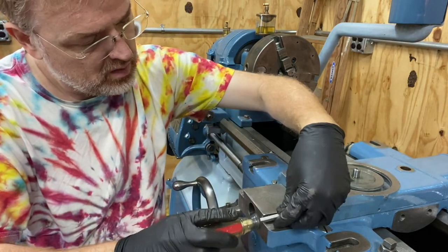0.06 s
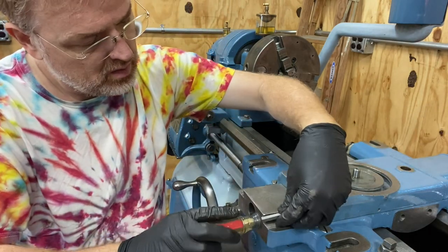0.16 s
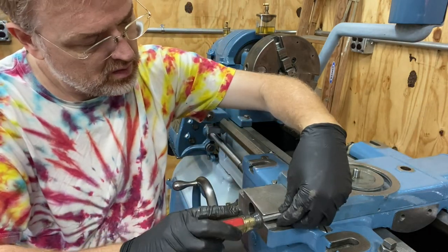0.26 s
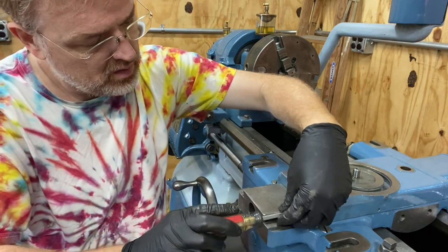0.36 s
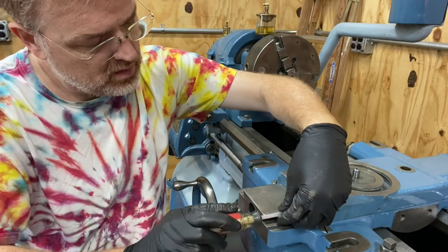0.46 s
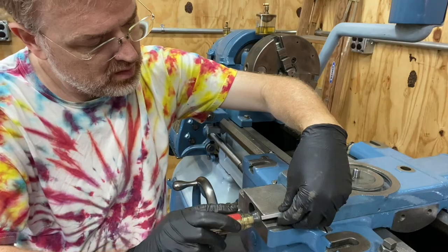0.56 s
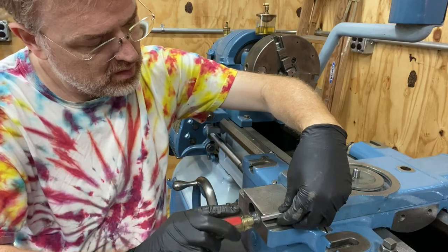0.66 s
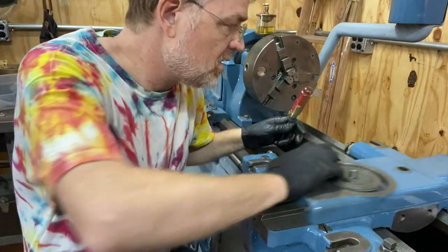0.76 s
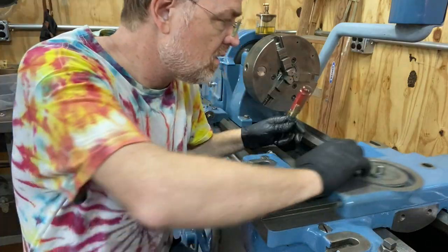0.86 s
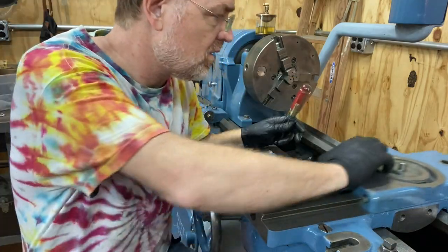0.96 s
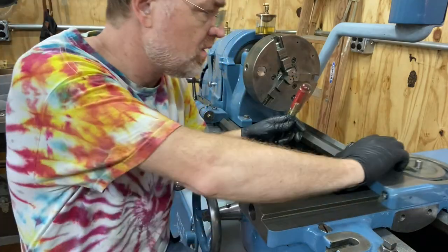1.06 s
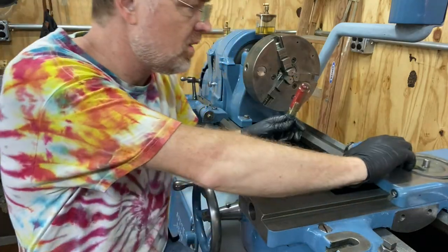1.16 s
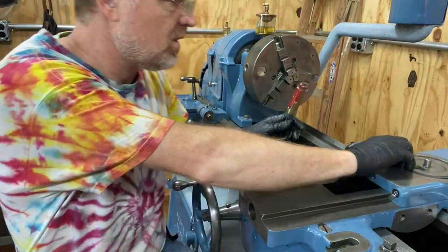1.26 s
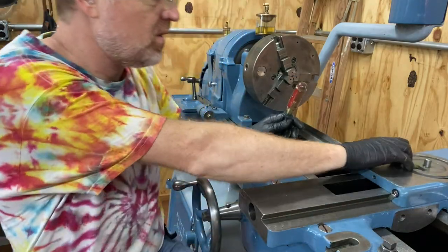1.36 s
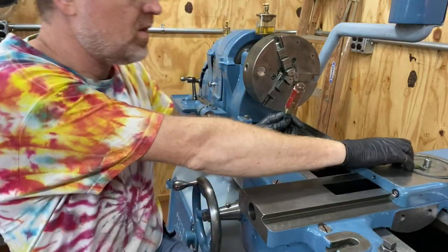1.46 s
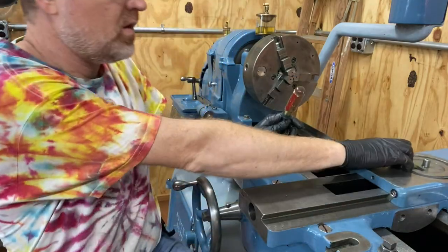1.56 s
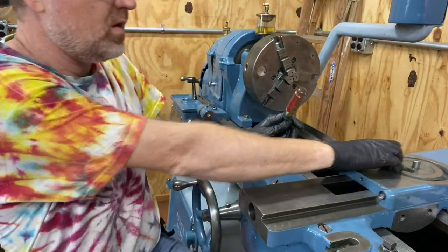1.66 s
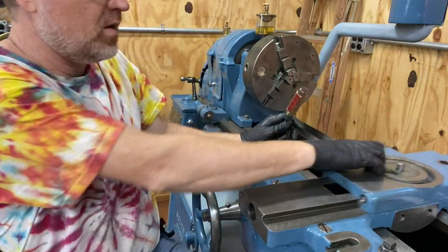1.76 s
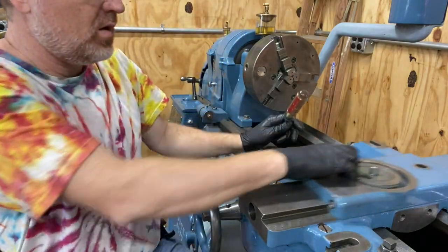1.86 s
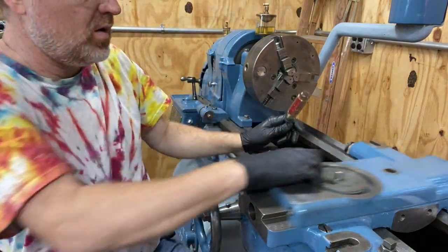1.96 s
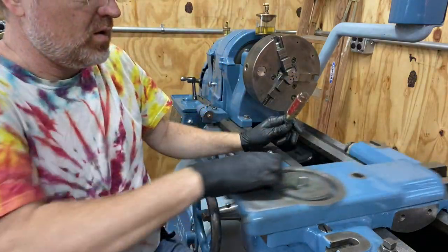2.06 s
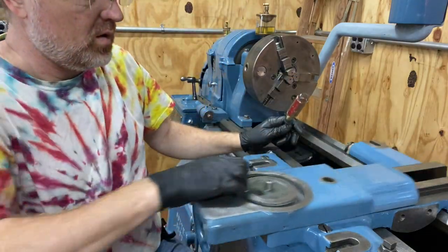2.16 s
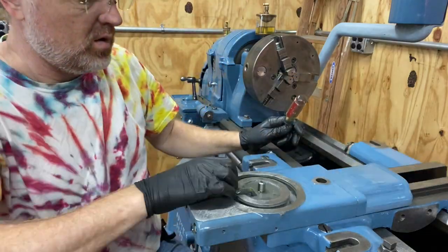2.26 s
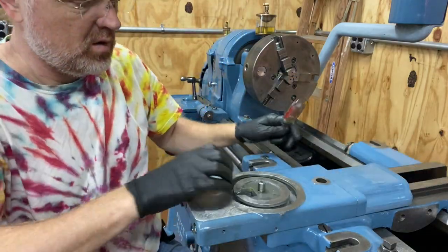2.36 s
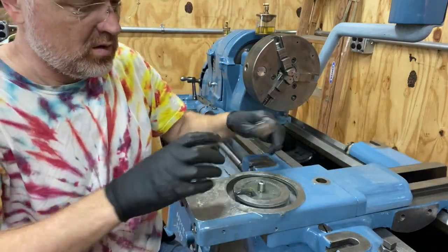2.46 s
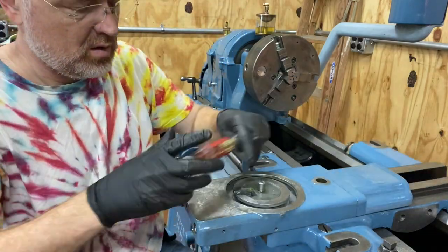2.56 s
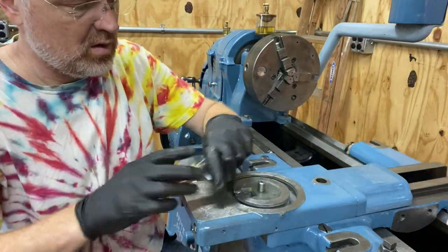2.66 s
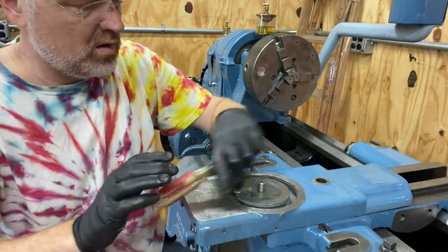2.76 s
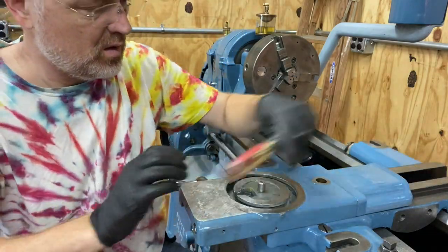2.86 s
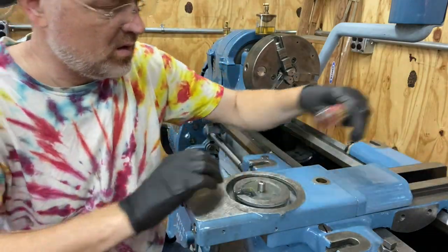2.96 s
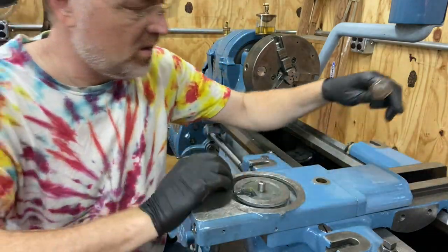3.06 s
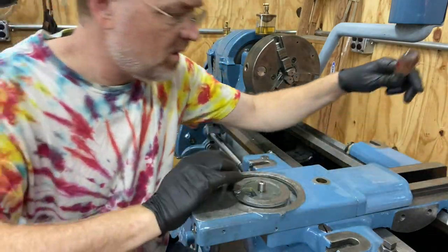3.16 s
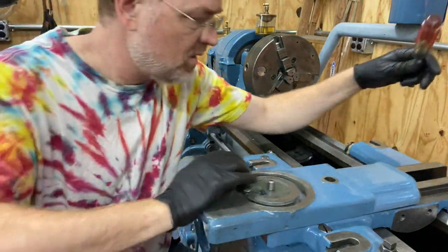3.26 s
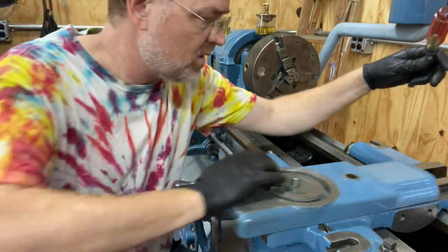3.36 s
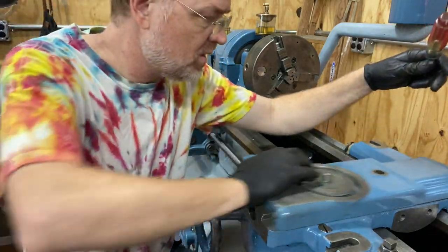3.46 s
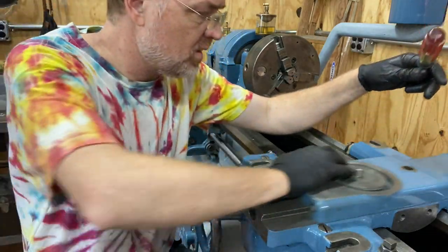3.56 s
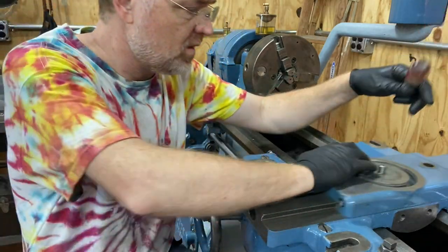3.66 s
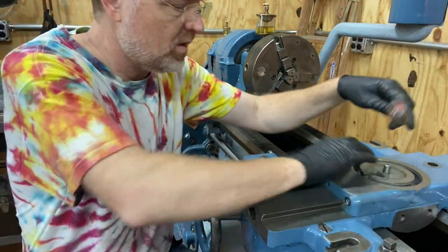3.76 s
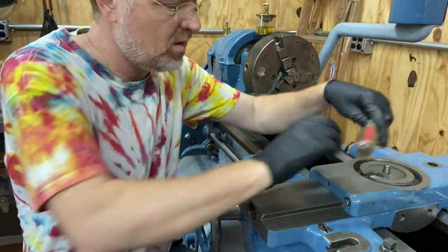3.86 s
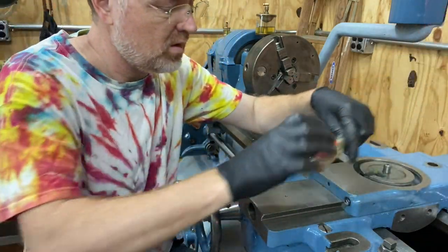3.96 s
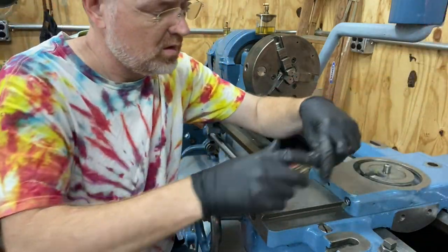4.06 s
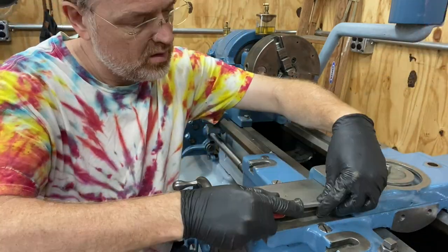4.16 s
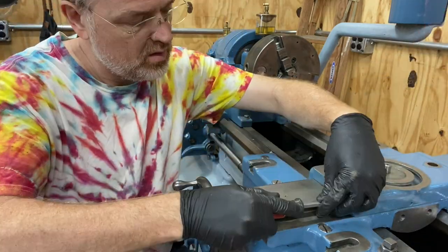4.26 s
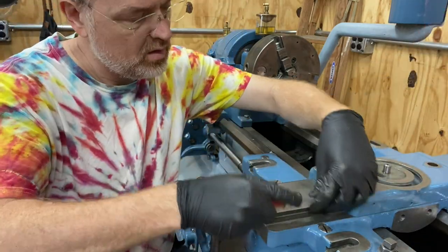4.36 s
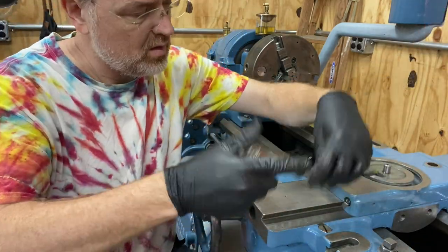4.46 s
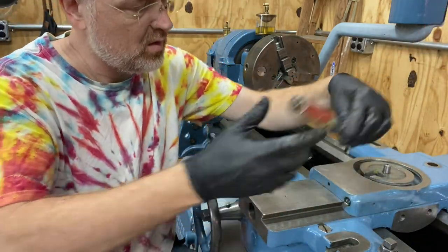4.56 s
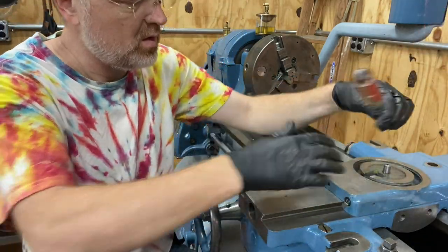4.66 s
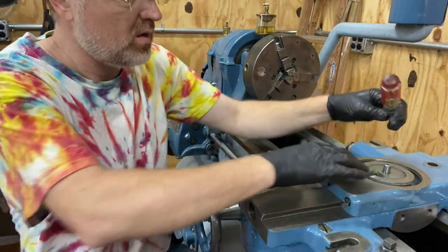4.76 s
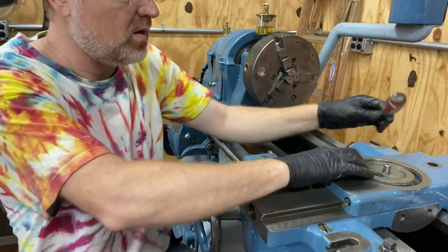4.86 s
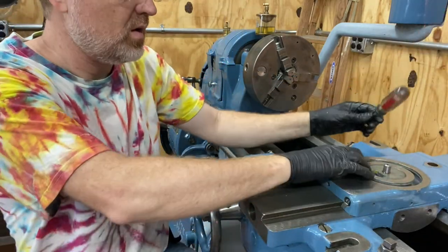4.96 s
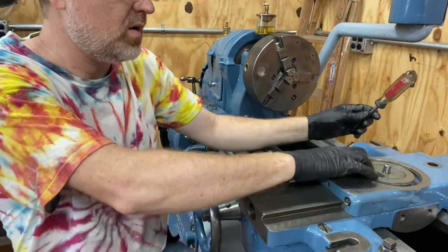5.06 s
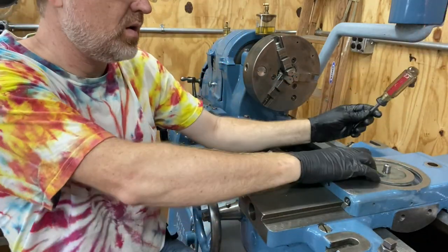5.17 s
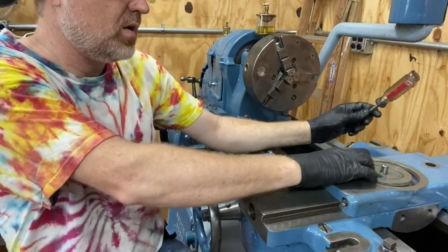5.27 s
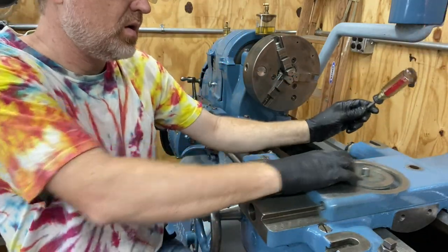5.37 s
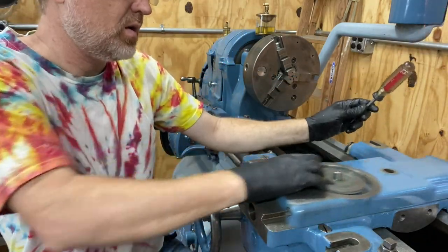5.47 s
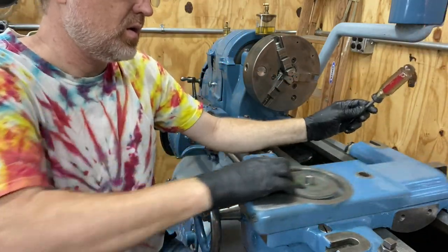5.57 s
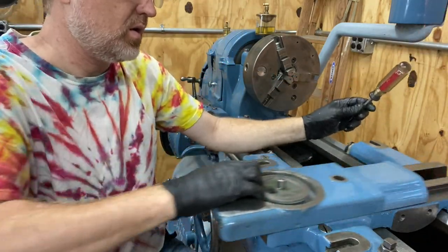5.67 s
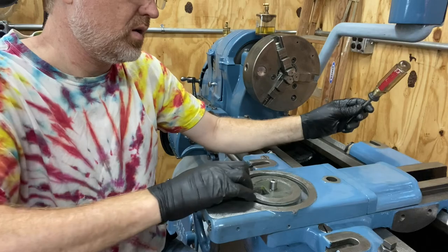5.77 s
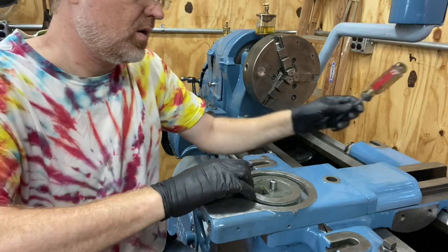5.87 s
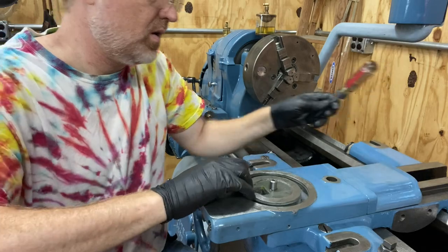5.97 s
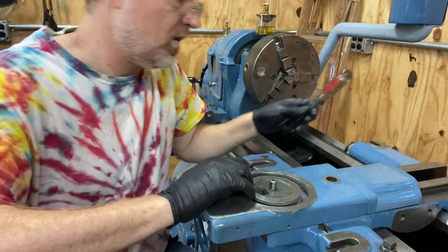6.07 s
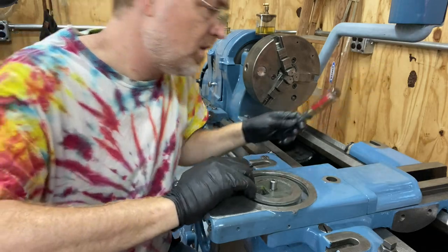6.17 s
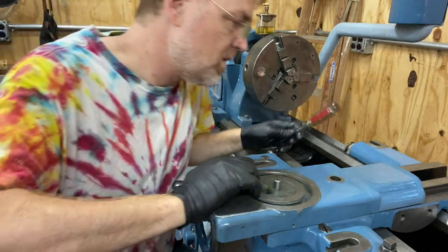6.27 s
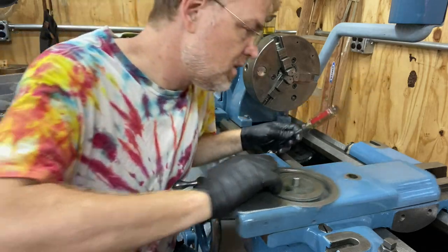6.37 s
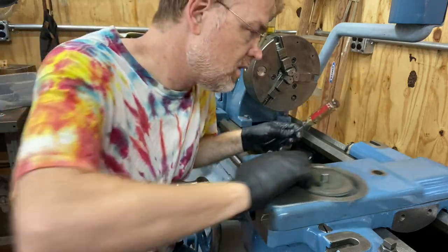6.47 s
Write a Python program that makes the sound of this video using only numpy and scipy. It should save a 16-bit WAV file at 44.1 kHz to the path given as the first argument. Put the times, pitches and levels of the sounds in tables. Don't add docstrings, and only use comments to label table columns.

```python
import sys
import numpy as np
from scipy import signal
from scipy.fft import rfft, irfft, next_fast_len
from scipy.io import wavfile
from scipy.ndimage import uniform_filter1d

SR = 44100
rng = np.random.default_rng(int(sys.argv[2]) if len(sys.argv) > 2 else 0)


def unload_audio(sound):
    columns = np.transpose(np.atleast_2d(sound))
    steps = np.round(np.clip(columns, -1, 1) * 32767)
    wavfile.write(sys.argv[1], SR, steps.astype(np.int16))


def invert_db(x):
    u = np.asarray(x, float) / 20
    return 10 ** u


N = 287973
LEFT_LAG_SAMPLES = 12
APART_HZ = 330

# freq_hz, level_db_per_hz
SCRAPE_COLOUR = [(260, -26), (450, -13.5), (737, -4.5), (840, 0.5), (920, -2), (1300, -2.5), (3550, -4.5),
                 (5000, -13), (6500, -42.5), (11000, -120)]
# (freq_hz, level_db, t60_s)
TAP_BODY = ([(180, -51), (300, -35), (714, -6.5), (869, -13), (1300, 1.5), (2660, -9), (8500, -15)],
             [(774, 1.5, 0.1), (994, -2.5, 0.13), (1283, -6, 0.1), (1650, -8, .08), (2160, -11, 0.066)])
CUTS_S = [0, .604, 2.562, 4.115, 6.6]


def evened(x):
    return x / np.sqrt(np.mean(x ** 2) + 1e-20)


def read(points, hz):
    f, value = np.transpose(points)
    return np.interp(np.log(hz + 1), np.log(f + 1), value)


def add(mix, start_s, sound):
    part = mix[..., round(start_s * SR):][..., :sound.shape[-1]]
    part += sound[..., :part.shape[-1]]


def opened(points, fall_db):
    return points + [(14900, points[-1][1] + fall_db), (15600, -57)]


def coloured(x, points, tilt_db=0):
    hz = np.fft.rfftfreq(4096, 1 / SR)
    gain_db = read(points, hz) + tilt_db * np.log2(hz / 1000 + 0.025)
    half = np.log(invert_db(np.maximum(gain_db, -90)))
    log_gain = np.r_[half, half[-2:0:-1]]
    phase = -signal.hilbert(log_gain).imag
    taps = np.fft.ifft(np.exp(log_gain + 1j * phase)).real[:2048]
    return signal.oaconvolve(x, taps / np.linalg.norm(taps))[:len(x)]


def resonate(x, hz, width_hz):
    turn = np.exp(2j * np.pi * np.cumsum(hz) / SR)
    r = np.exp(-np.pi * width_hz / SR)
    return 2 * (turn * signal.lfilter([1 - r], [1, -r], x / turn)).real


def air():
    # freq_hz, level_db_per_hz
    air_colour = [(120, -28), (200, 0), (748, -10.5), (3000, -15), (7970, -29), (13200, -19),
                  (15000, -36.5)]
    hiss = np.array([evened(coloured(rng.standard_normal(N), air_colour)) for _ in range(2)])
    whine = resonate(rng.standard_normal(N), np.full(N, 4800), 40)
    return invert_db(-71) * hiss + invert_db(-85.5) * evened(whine)


def bed(scrape_gain):
    # freq_hz, level_db_per_hz
    rumble_colour = [(12, -35), (20, 11), (59, 9.5), (145, -3.5), (173, -11), (248, -8), (357, -23.5),
                     (400, -10), (520, -38.5), (880, -120)]
    # start_s, level_db, t60_s
    shudders = [(0.84, -51, 1), (1.2, -42, 0.38), (1.86, -44, 0.25), (2.22, -41, 0.63), (2.78, -31, 0.27),
                (3.04, -34.5, 0.3), (3.358, -31.5, 0.14), (3.72, -41.5, 0.53), (3.96, -43.5, 0.38),
                (4.88, -34.5, 0.72), (5.33, -51, 0.36), (5.6, -41.5, 1), (6.149, -45, 0.47)]
    quiet_db, drag_share_db, rise_s = -62, -15.5, 0.026
    shared, left, right = (coloured(rng.standard_normal(N), rumble_colour) for _ in range(3))
    power = invert_db(quiet_db) ** 2 + (invert_db(drag_share_db) * scrape_gain) ** 2
    t = np.arange(SR // 2) / SR
    for s, db, t60 in shudders:
        add(power, s, (np.minimum(t / rise_s, 1) * invert_db(db - 60 * t / t60)) ** 2)
    return np.sqrt(power) * evened(shared + .3 * np.array([left, right]))


def control():
    # time_s, drag_db, speed_0_to_1
    pushes = [
        [(0.706, -45, 0.8), (0.8, -49, 0.88), (0.97, -50.5, .95), (1.09, -50, 0.64), (1.166, -51.5, 0.43),
         (1.28, -64, 0.2)],
        [(1.51, -65, 0.04), (1.54, -54, 0.37), (1.6, -51, 0.77), (1.8, -49.5, 0.9), (1.92, -46.5, 0.82),
         (2.04, -41, 0.97), (2.168, -46, 0.7), (2.23, -72, 0)],
        [(3.14, -54, 0.27), (3.246, -44.5, 0.82), (3.426, -44, 0.93), (3.55, -48.5, 0.84), (3.67, -51, 0.81),
         (3.72, -60, 0.15)],
    ]
    # time_s, drag_db, speed_0_to_1
    pulls = [
        [(5.19, -65, 0.13), (5.29, -50.5, 0.79), (5.418, -47.5, 0.83), (5.476, -45.5, 0.9), (5.59, -44, 0.89),
         (5.68, -47.5, 0.72), (5.73, -76, 0.13)],
        [(6.185, -68, .05), (6.254, -49.5, 0.77), (6.36, -46, 0.83), (6.43, -42.5, 0.88), (6.53, -52.5, 0.87)],
    ]
    # start_s, length_s, scrape_db, hiss_db, fade_db (over the length)
    brushes = [(0, 0.14, -97, -66.5, -9), (0.604, 0.07, -47, -52.5, -27), (2.555, 0.091, -65, -56, -10.5),
               (2.665, 0.11, -63, -87, -4.5), (2.973, 0.061, -60, -61, -4), (3.04, 0.084, -49.5, -60, -1),
               (3.726, 0.11, -79, -66.5, -8), (3.853, 0.072, -88, -73, -7), (4.268, 0.04, -80, -74, 0),
               (3.976, 0.13, -63.5, -65.5, 5), (4.31, 0.13, -64.5, -59.5, -2), (4.455, 0.22, -74, -73, -10),
               (4.712, 0.15, -62, -70, 2), (4.87, 0.23, -42, -60.5, -19.5), (1.306, 0.23, -75, -68.5, -9.5),
               (5.036, .14, -91.5, -75.5, 6), (5.768, 0.17, -85, -67, -11)]
    grip_s, let_go_s, brush_rise_s = 0.0034, 0.071, 0.0078
    fast_hiss_db, hiss_db_per_speed = -50, 24.5
    t = np.arange(N) / SR
    scrape, hiss = np.full(N, invert_db(-83.5) ** 2), np.full(N, invert_db(-81) ** 2)
    speed = np.zeros(N)
    for stroke in pushes + pulls:
        s, drag_db, pace = np.transpose(stroke)
        on = np.clip((t - s[0]) / grip_s + 1, 0, 1) * np.clip((s[-1] - t) / let_go_s + 1, 0, 1)
        pace = np.interp(t, s, pace)
        scrape += (on * invert_db(np.interp(t, s, drag_db))) ** 2
        hiss += (on * invert_db(fast_hiss_db + hiss_db_per_speed * (pace - 1))) ** 2
        speed += on * pace
    for start, length, scrape_db, hiss_db, fade_db in brushes:
        count = round(length * SR)
        fade = invert_db(fade_db * np.linspace(0, 1, count))
        fade = fade * np.minimum(np.arange(count) / SR / brush_rise_s, 1)
        add(scrape, start, (invert_db(scrape_db) * fade) ** 2)
        add(hiss, start, (invert_db(hiss_db) * fade) ** 2)
    return np.sqrt(scrape), np.sqrt(hiss), speed


def grit(per_s, spread_db):
    at = rng.integers(0, N, int(per_s * N / SR))
    size = invert_db(spread_db * np.minimum(rng.exponential(1, len(at)), 4))
    out = np.zeros(N)
    out[at] = size * rng.choice([-1., 1.], len(at))
    return evened(out)


def wander(hz, db):
    slow = signal.lfilter(*signal.butter(N=2, Wn=hz, fs=SR), rng.standard_normal(N))
    return invert_db(db * evened(slow))


def squeaks(per_s, lo_hz, hi_hz, count=14):
    out = np.zeros(N)
    for hz in np.geomspace(lo_hz, hi_hz, count):
        t = np.arange(0, rng.uniform(0.0079, 0.042), 1 / SR)
        bend_per_s = rng.uniform(-4.5, 1.0)
        note = np.hanning(len(t)) * np.sin(2 * np.pi * hz * t * (1 + bend_per_s * t))
        out += signal.oaconvolve(grit(per_s / count, 3.3), note / np.linalg.norm(note))[:N]
    return evened(coloured(out, SCRAPE_COLOUR))


def groans(catches):
    # middle_s, length_s, level_db (over the scrape), pitch_hz
    tight_spots = [(0.956, 0.29, -7.5, 253), (1.08, 0.24, -11, 540), (1.006, .12, -3, 1200),
                   (1.99, 0.062, -1.5, 2430), (2.05, 0.071, -3, 1540), (2.16, 0.072, -6, 2740),
                   (5.385, 0.046, -1, 970), (5.41, 0.1, 1, 1500), (5.49, .06, -1, 2100),
                   (6.4, .06, -2.5, 4400), (6.3, 0.049, -6, 2400), (5.31, .1, -4, 1450),
                   (1.565, 0.039, -4, 470), (1.845, 0.23, -3.5, 260), (2.13, 0.24, -1, 498),
                   (2.126, 0.13, -2, 258), (3.36, 0.14, -3, 526), (3.29, .05, -2, 1700),
                   (3.435, .05, -3, 2430), (3.51, .06, -3, 1400), (4.33, .06, 4, 2500), (4.6, .2, 3, 3100),
                   (5.365, 0.19, -12.5, 273), (5, 0.1, 0, 550), (6.34, 0.22, -1.5, 500),
                   (1.786, 0.18, -10.5, 590), (3.5, 0.19, -4, 765), (6.24, 0.11, -6, 810),
                   (2.14, 0.13, 1, 800), (5.9, 0.17, 5.5, 2100), (3.37, 0.28, -7.5, 245),
                   (5.45, 0.17, -11, 2000), (4.325, 0.046, 9.5, 1700), (4.352, 0.065, 14, 4100),
                   (2.062, 0.096, 2, 1170), (5.592, 0.12, -2, 1500)]
    width_share = 0.37
    out = invert_db(-12) * evened(signal.lfilter(*signal.iirpeak(550, 1.3, SR), catches))
    for s, length, db, hz in tight_spots:
        swell = np.hanning(round(length * SR))
        part = catches[round((s - length / 2) * SR):][:len(swell)]
        ring = signal.iirpeak(hz, 1 / width_share, SR)
        groan = evened(signal.lfilter(*ring, signal.lfilter(*ring, part)))
        add(out, s - length / 2, invert_db(db - 0.5) * swell * groan)
    return out


def patchy(x):
    z = signal.stft(x, nperseg=512)[2]
    patches = uniform_filter1d(rng.standard_normal(z.shape[1:]), size=5, axis=0)
    patches = evened(uniform_filter1d(patches, size=9, axis=1))
    return signal.istft(z * invert_db(1.7 * patches), nperseg=512)[1][:, :N]


def slide(scrape_gain, hiss_gain, speed):
    # freq_hz, level_db_per_hz
    hiss_colour = [(1760, -8.5), (3000, -1.5), (3650, 3.5), (5260, -0.5), (8500, -3)]
    # freq_hz, width_hz, level_db
    slide_rings = [(593, 14, -9), (1260, 115, -1), (2330, 43, 5), (3100, 14, 7)]
    slow_hz, fast_hz = 900, 1360
    drag, specks = wander(30, 1.3), squeaks(500, 500, 3600)
    centre_hz = (slow_hz + (fast_hz - slow_hz) * speed) * wander(5, .6)
    sides = []
    shared = grit(5000, 0.93)
    for _ in range(2):
        catches = (shared + 1.97 * grit(5000, 2.3)) * drag
        rings = np.zeros(N)
        for hz, width, db in slide_rings:
            rings += invert_db(db) * evened(signal.lfilter(*signal.iirpeak(hz, hz / width, SR), catches))
        scrape = evened(coloured(catches, SCRAPE_COLOUR)) + invert_db(-29) * evened(rings)
        scrape += invert_db(-11.0) * evened(resonate(catches, centre_hz, 320)) + invert_db(-5) * specks
        scrape += groans(catches)
        fine = (shared + 8.5 * grit(9000, 3.55)) * drag ** 0.35
        hiss = evened(coloured(fine, opened(hiss_colour, -5.0)))
        sides.append(scrape_gain * evened(scrape) + invert_db(1.87) * hiss_gain * hiss)
    return invert_db(3.0) * patchy(np.array(sides))


def knocks(events, body, ring_db, crack_db, rise_s, treble_fade, top_db):
    colour, rings = body
    out, t = np.zeros((2, N)), np.arange(SR // 3) / SR
    lead_s = np.array([[LEFT_LAG_SAMPLES / SR], [0]])
    end_fade = np.minimum(20 * (t[-1] - t), 1)
    for s, db, t60, *more in events:
        pan_db, tilt_db = more or (0, 0)
        hz, frame_s, z = signal.stft(rng.standard_normal(len(t)), SR, nperseg=256)
        hz = np.maximum(hz, 120)[:, None]
        decay = invert_db(-60 * frame_s / (t60 * (hz / 1000) ** -treble_fade))
        z = z * decay * (1 - np.exp(-(frame_s + 0.0016) * hz / 0.85))
        buzz = signal.istft(z, SR, nperseg=256)[1][:len(t)] * np.minimum(t / rise_s, 1)
        buzz[0] = invert_db(crack_db)
        blow = coloured(buzz, opened(colour, top_db), tilt_db)
        for f, d, ring in rings:
            shape = invert_db(ring_db + d - 60 * t / min(ring, 1.3 * t60))
            shape = shape * np.minimum(t / (rise_s + 1.3 / f), 1)
            twin_hz = (1 + 0.011 * rng.uniform(-0.97, 1)) * f
            twin_turns = rng.random((2, 1)) * min(f / APART_HZ, 1)
            twin = np.sin(2 * np.pi * (twin_hz * (t + lead_s) + twin_turns))
            main = np.sin(2 * np.pi * (f * (t + lead_s) + rng.random()))
            blow = blow + shape * (main + 0.76 * twin)
        gain = invert_db(db + np.array([[pan_db], [-pan_db]]) / 2)
        add(out, s + .0015, gain * blow * end_fade / 3)
    return out


def glove_rubs():
    # start_s, peak_db, t60_s, left_right_db, tilt_db_per_octave
    rubs = [
        (0.001, -45.5, 0.7, .1, 10),
        (2.385, -49, 0.13, .1, 8.2),
        (2.6, -36, .3, .1, 4.6),
        (4.39, -37, 0.3, .1, 7.5),
        (2.28, -32, 0.087, 0.0088, 4.9),
        (2.562, -35.5, 0.43, 0.011, 4.8),
        (4.028, -26, 0.097, 0, 5.2),
        (4.316, -33, 0.071, 0.015, 1.4),
        (4.34, -27, 0.094, 0.017, 1.6),
    ]
    return knocks(rubs, (TAP_BODY[0], []), -35.0, -24.0, 0.018, 0.14, -2.5)


def tool_taps():
    # start_s, peak_db, t60_s, left_right_db, tilt_db_per_octave
    taps = [
        (0.2, -56, 0.22, -12, 3),
        (0.261, -34, 0.17, -4.5, -3),
        (0.393, -42, 0.055, -4, -5.5),
        (0.440, -33.5, 0.12, -2.5, -6),
        (0.606, -32.5, 0.08, -11, 1.5),
        (0.706, -31.5, 0.098, -7, 1),
        (2.98, -42, 0.096, 12, -12),
        (4.769, -41, 1, -9, 5),
        (5.881, -56, 0.085, -13, 5),
    ]
    return knocks(taps, TAP_BODY, -7, 4.3, 0.00076, 1.0, -0.98)


def flicks():
    # start_s, peak_db, t60_s, left_right_db, tilt_db_per_octave
    flick_events = [(.262, -45.5, 0.046, -5, 7), (.392, -57, .03, -1, 0), (.607, -41, 0.023, -10, 3),
                    (2.566, -46, .04, -12, 7), (3.951, -34, 0.054, 13, -5), (4.319, -42, .04, -3, 1),
                    (2.123, -38, .06, 0.5, 4), (2.428, -52, .06, -5, 0.5), (2.475, -55, .04, .5, 0),
                    (2.481, -53, 0.09, -6, 1), (2.532, -56, .06, -7, 2), (2.584, -47, .05, 2, -3),
                    (2.643, -49, .06, 0, -2), (4.365, -30.5, 0.054, -1, 1.5), (4.437, -37, 0.044, -2, -4),
                    (4.791, -37, .04, -9, 10), (4.752, -50, .04, -2, 0), (6.055, -57, 0.046, -2, -2)]
    # colour (freq_hz, level_db_per_hz), no rings
    flick_body = ([(300, -24.5), (900, -9), (1600, -3), (2400, -0.5), (3600, -9.5), (5000, -9),
                   (8500, -23.5)], [])
    return knocks(flick_events, flick_body, -20, 21.4, 0.00038, 0.31, -14)


def bumps():
    # start_s, peak_db, pitch_hz, t60_s
    bump_events = [(0.71, -39, 53.5, 0.26), (1.184, -31.5, 430, 0.036), (1.207, -38, 142, 0.04),
                   (1.25, -42, 130, .25), (2.206, -32.5, 373, 0.046), (2.233, -35, 139, 0.11),
                   (3.343, -35, 357, 0.056), (3.708, -40.5, 400, 0.098), (3.739, -46, 138, 0.26),
                   (3.78, -42.5, 137, 0.19), (3.963, -30, 270, 0.073), (4.735, -38, 200, .15),
                   (4.809, -13, 125, 0.06), (4.83, -31, 55, .25), (4.875, -29, 75, .1),
                   (5.045, -36, 120, .08), (6.28, -40, 290, .08), (2.785, -28, 334, .15),
                   (4.849, -30, 249, 0.18), (4.958, -29, 229, 0.17), (4.974, -22.5, 247, 0.15),
                   (5.57, -36.5, 325, 0.16), (5.711, -45.5, 405, 0.21), (5.741, -40.5, 109, 0.26),
                   (5.791, -35.5, 114, 0.19), (6.17, -50, 76, 0.15), (6.285, -34.5, 130, 0.097),
                   (6.315, -35, 122, 0.08)]
    out, t = np.zeros((2, N)), np.arange(SR // 3) / SR
    end_fade = np.minimum(20 * (t[-1] - t), 1)
    for s, db, hz, t60 in bump_events:
        swell = 1 - np.exp(-t * hz / 0.32)
        apart_turns = np.array([[.12], [-.12]]) * min(hz / APART_HZ, 1) ** 2
        note = np.sin(2 * np.pi * (hz * t + apart_turns))
        add(out, s, invert_db(db - 60 * (t / t60) ** 1.03) * swell * note * end_fade)
    return invert_db(-1.2) * out


def strip_snaps():
    # start_s, peak_db, t60_s, left_right_db, tilt_db_per_octave
    snap_events = [
        (1.144, -15, 0.013, -1.2, -0.0013),
        (1.152, -23, 0.026, -1.5, -1.1),
    ]
    # (freq_hz, level_db, t60_s)
    snap_body = ([(120, -45), (220, -23), (450, -6), (923, -0.5), (1540, -11), (2300, 6.5), (3000, -2),
                  (3500, -9), (4400, -10), (5500, -13), (8500, -31)], [(2665, -30, 0.0033)])
    out = knocks(snap_events, snap_body, 4.2, 21.5, 0.0002, 0.43, -1)
    out[0] = np.roll(out[0], -16)
    return out


def end_thuds():
    # start_s, peak_db, t60_s
    thud_events = [
        (1.186, -34, 0.21),
        (2.205, -28.5, 0.22),
        (3.71, -33, 0.22),
        (4.723, -31.5, 0.24),
        (5.57, -31, 0.46),
        (5.715, -28.5, 0.18),
        (6.287, -37.5, 0.73),
    ]
    # (freq_hz, level_db, t60_s)
    thud_body = ([(59, -51.5), (100, -3), (403, -6.5), (654, -5.5), (1170, -11.5), (2070, -26),
                  (3000, -36)], [(430, 14.7, 0.055), (1238, 9, 0.042)])
    return knocks(thud_events, thud_body, -12.0, 3, 0.0043, 0.088, -78)


def dull_clunk():
    # start_s, peak_db, t60_s
    dull_event = [
        (2.765, -14, 0.34),
    ]
    # (freq_hz, level_db, t60_s)
    dull_body = ([(24, -58), (40, -15.5), (192, -7.5), (421, -1.5), (539, -16), (700, 1.5), (1060, -21.5),
                  (1240, -17), (1600, -21), (2800, -22), (3400, -31), (8500, -52)], [(147, -18, 0.27),
                  (200, -3, 0.12), (262, -8.5, 0.14), (334, -9, 0.2), (415, -8, 0.16), (716, -2, 0.07),
                  (670, -9, 0.25), (808, -12.5, 0.37), (902.5, -5, 0.12), (1222, -4.5, 0.068),
                  (1557, -23, 0.24), (2347, -29, 0.4), (2700, -35, 0.22)])
    return knocks(dull_event, dull_body, 2.5, 2.8, 0.0051, 0.16, 0)


def clicks():
    # start_s, peak_db, t60_s
    click_events = [
        (3.023, -12.5, 0.08),
        (3.046, -27, .2),
        (3.085, -31, .15),
        (3.422, -27, 0.1),
    ]
    # (freq_hz, level_db, t60_s)
    click_body = ([(150, -36), (300, -0.5), (444, -6.5), (633, -13.5), (950, -3.5), (1290, 0.5),
                   (2810, -4.5), (3400, -16), (3800, -12), (4200, -26), (5500, -17), (8500, -17)],
                   [(835, -8, 0.3), (1738, -4, 0.5), (2380, -5, 0.45), (2500, -14, .3), (980, -9, 0.041),
                   (348, -8, 0.16), (2850, -7, 0.06), (3820, -13, 0.15)])
    return knocks(click_events, click_body, -7.5, 8.7, 0.001, 0.23, -61.0)


def clanks():
    # start_s, peak_db, t60_s
    clank_events = [
        (3.935, -21, 0.099),
        (3.948, -16, 0.12),
        (4.790, -10.5, 0.079),
        (4.935, -28, 0.13),
        (3.99, -31, 0.096),
    ]
    # (freq_hz, level_db, t60_s)
    clank_body = ([(71, -21), (120, -13), (309, -2), (536, -11.5), (780, -8.5), (1740, -4), (2040, -10.5),
                   (2800, -7.5), (3400, -22), (8500, -30)], [(169, -6, 0.13), (691, -15.5, 0.33),
                   (1400, -19, 0.3), (1723, -11, .35), (3960, -16, 0.046), (2310, -7, .4),
                   (2690, -11, 0.26), (1300, -8, .05), (850, -8, .05)])
    return knocks(clank_events, clank_body, -7.5, 2.8, 0.0051, 0.56, -9.0)


def hard_clunk():
    # start_s, peak_db, t60_s, left_right_db, tilt_db_per_octave
    hard_events = [
        (4.797, -13, 0.14, -3, 0.47),
        (4.803, -15.5, 0.42, 2.5, 0.12),
    ]
    # (freq_hz, level_db, t60_s)
    hard_body = ([(15, -42), (40, -6), (248, -11.5), (423, -18), (514, -10.5), (880, -15), (1330, -10.5),
                  (2700, -16), (4700, -29), (6000, -28.5), (8500, -41)], [(113, -9, 0.31),
                  (197, -12, 0.166), (348, -13, 0.19), (248, -17, .2), (524, -13, .2), (670, 8, 0.026),
                  (1002, 16, 0.035), (783, 4, 0.026), (1230, 2, .03), (1445, -0.5, 0.05), (1940, -3, 0.041),
                  (2245, -4, 0.15), (2690, -9.5, 0.15), (4640, -8.5, 0.051)])
    return knocks(hard_events, hard_body, -6, 21.2, 0.00115, 0.33, -6)


def shop(direct, sent):
    # freq_hz, t60_s
    shop_decay = [(100, 0.48), (500, 0.44), (2000, 0.55), (5000, 0.43), (12000, 0.42)]
    taps = np.zeros((2, SR // 2))
    at = np.arange(120, SR // 2 - 20, 20) + rng.integers(0, 20, (2, (SR // 2 - 121) // 20))
    np.put_along_axis(taps, at, rng.choice([-1., 1.], at.shape), 1)
    hz, t, z = signal.stft(taps, SR, nperseg=256)
    z[1, :3] = z[0, :3] * [[1], [.85], [.3]] + z[1, :3] * [[0], [.52], [.95]]
    tail = signal.istft(z * invert_db(-60 * t / read(shop_decay, hz)[:, None]), SR, nperseg=256)[1]
    tail[:, :120] = 0
    tail = tail / np.linalg.norm(tail[0])
    out = np.array([np.roll(direct[0], LEFT_LAG_SAMPLES), direct[1]])
    for start, end in zip(CUTS_S, CUTS_S[1:]):
        a, b = round(start * SR), min(round(end * SR), N)
        out[:, a:b] += signal.fftconvolve(sent[:, a:b], tail, axes=1)[:, :b - a]
    return out


def scene():
    scrape_gain, hiss_gain, speed = control()
    scrape = slide(scrape_gain, hiss_gain, speed)
    small = glove_rubs() + tool_taps()
    near = flicks() + strip_snaps()
    lows = bumps()
    blows = end_thuds() + dull_clunk() + clicks() + clanks() + hard_clunk()
    blows[:, round(CUTS_S[3] * SR):round(4.3 * SR)] = 0
    sent = invert_db(-7.5) * small + invert_db(-3.5) * blows + invert_db(-9.5) * near
    sent += invert_db(-14.5) * lows + invert_db(-3.0) * scrape
    return shop(small + blows + near + lows + scrape, sent) + bed(scrape_gain) + air()


def band_limit(x):
    return signal.sosfilt(signal.butter(12, 15660, fs=SR, output="sos"), x)


def record(dry):
    # freq_hz, gain_db
    left_gain = [(200, -.3), (500, -2.5), (1500, -1.3), (5000, -1.9)]
    join_hz, alike_hz, turn_hz = 6400, 7900, 5150
    size = next_fast_len(N)
    hz, z = np.fft.rfftfreq(size, 1 / SR), rfft(dry, size)
    z = z * hz ** 2 / (hz ** 2 + 45 ** 2)
    z[0] *= invert_db(read(left_gain, hz))
    z *= np.clip((15750 - hz) / 500, .001, 1)
    joined = np.clip((hz - join_hz) / 1600 + .5, 0, 1)
    late = z[1] * np.exp(-2j * np.pi * (hz - alike_hz) / turn_hz)
    z = np.sqrt(1 - joined) * z + np.sqrt(joined) * np.array([z[1], late])
    return band_limit(irfft(z, size)[:, :N])


dry = scene()
out = record(dry)
unload_audio(out)
```